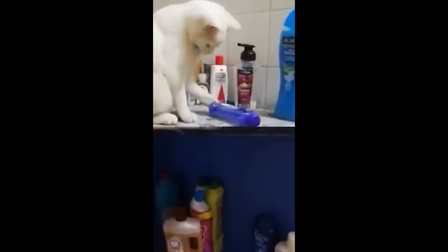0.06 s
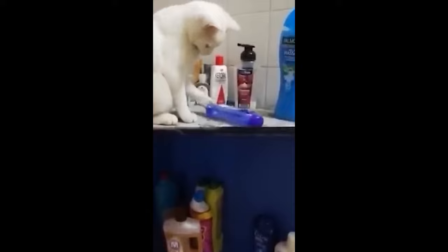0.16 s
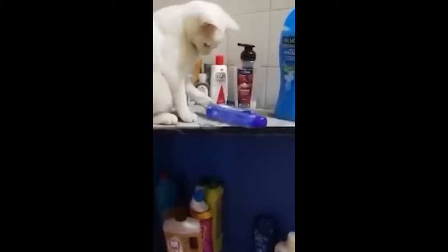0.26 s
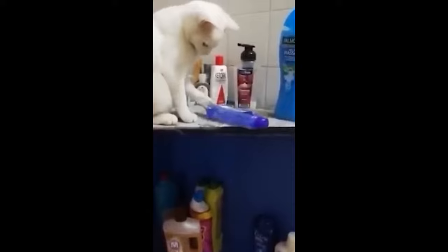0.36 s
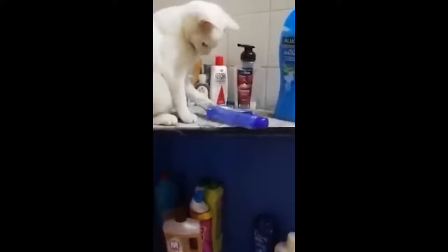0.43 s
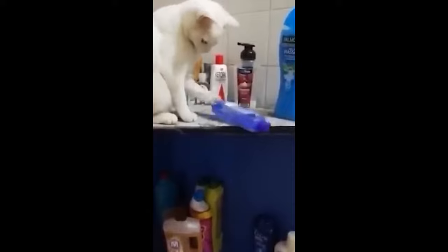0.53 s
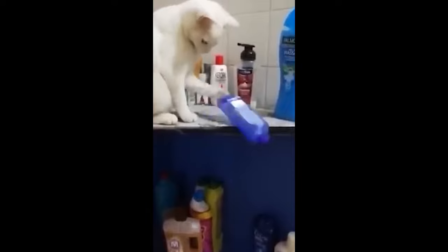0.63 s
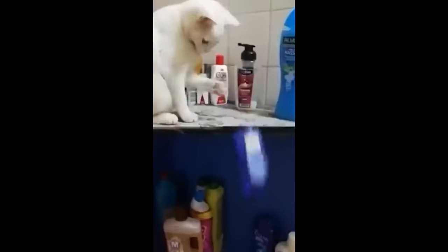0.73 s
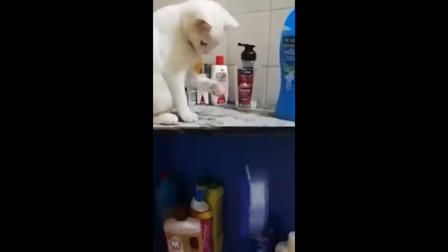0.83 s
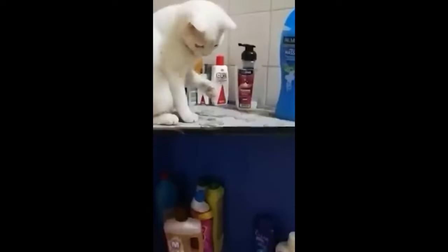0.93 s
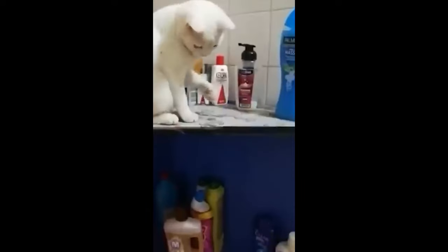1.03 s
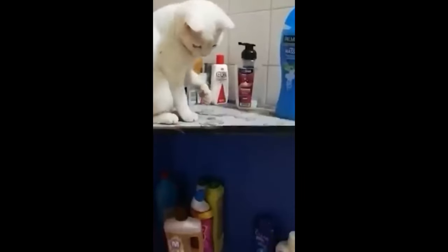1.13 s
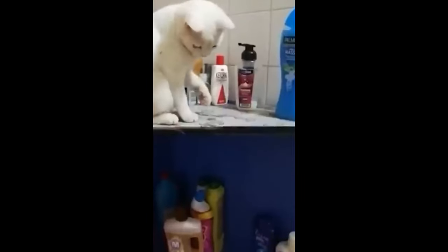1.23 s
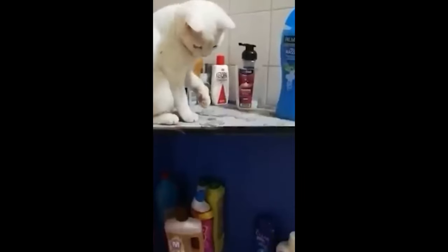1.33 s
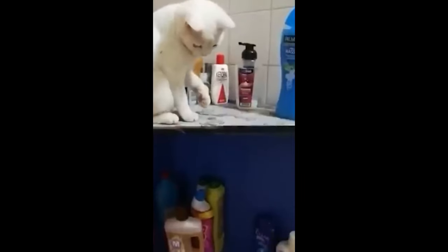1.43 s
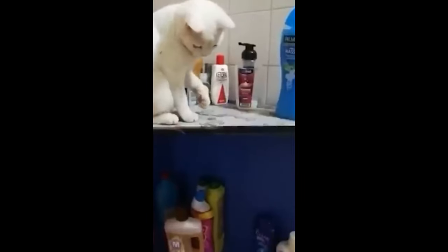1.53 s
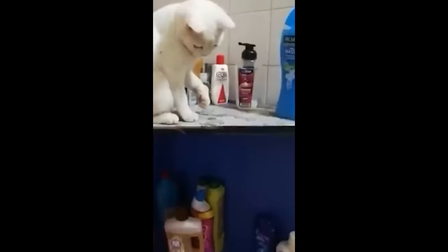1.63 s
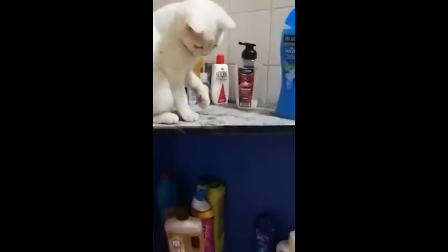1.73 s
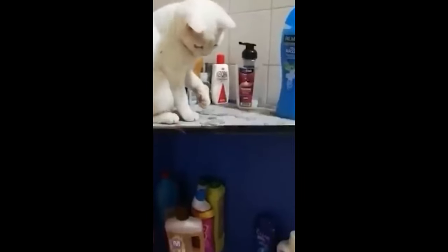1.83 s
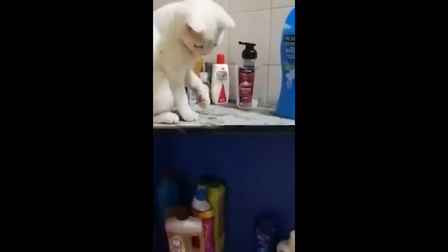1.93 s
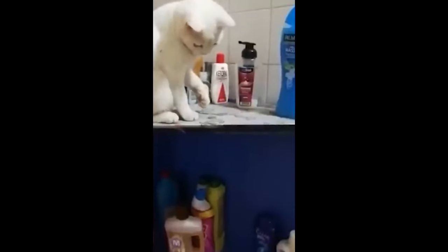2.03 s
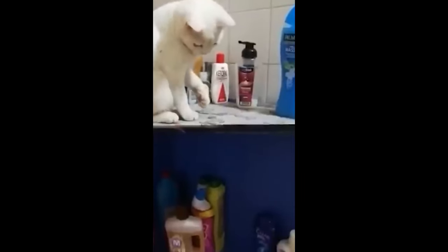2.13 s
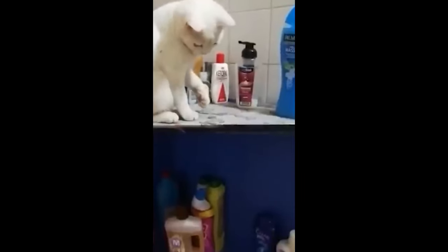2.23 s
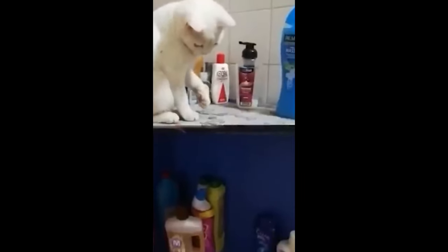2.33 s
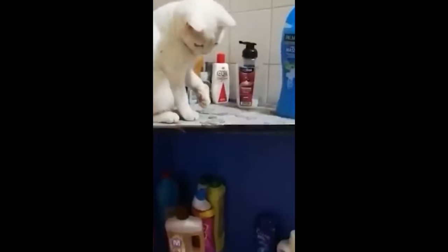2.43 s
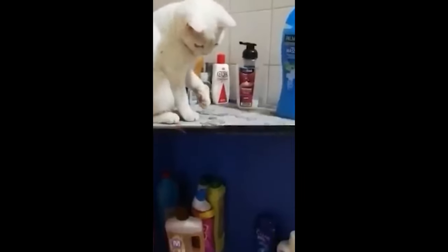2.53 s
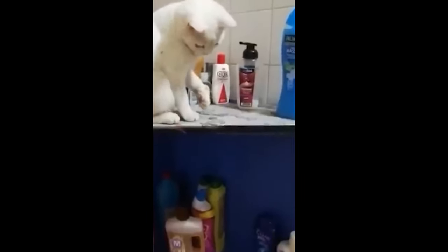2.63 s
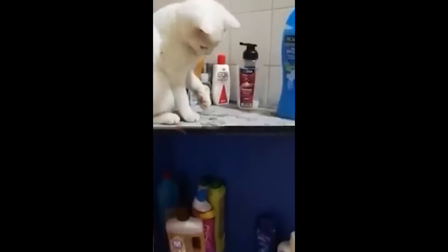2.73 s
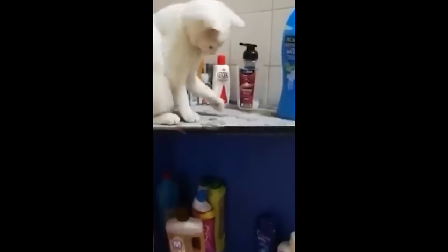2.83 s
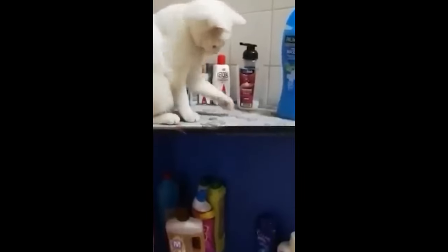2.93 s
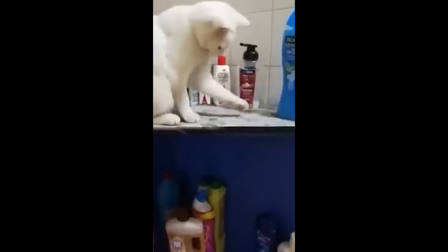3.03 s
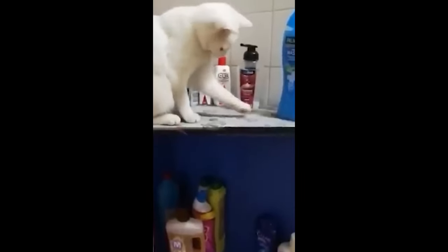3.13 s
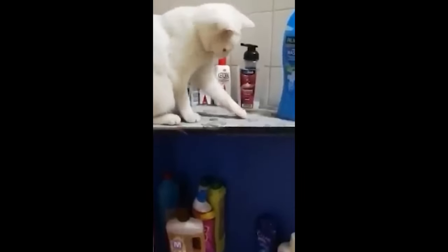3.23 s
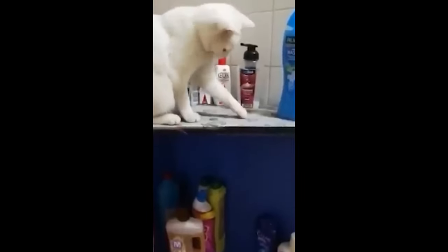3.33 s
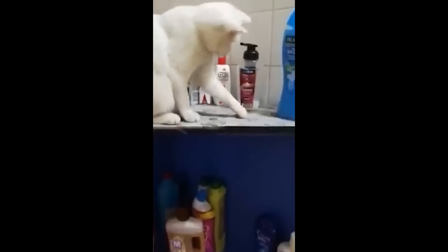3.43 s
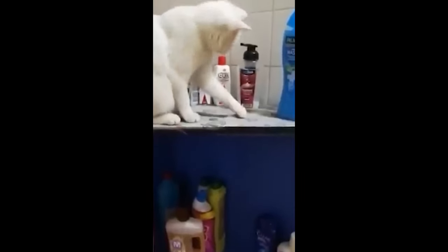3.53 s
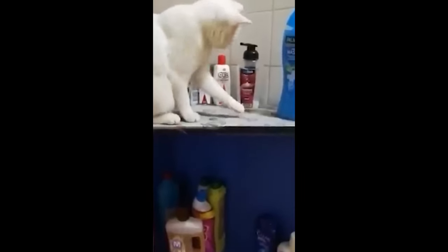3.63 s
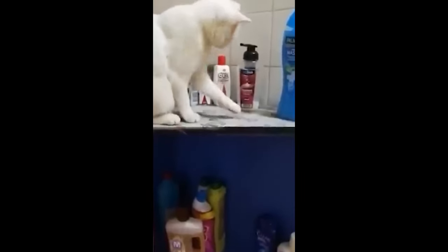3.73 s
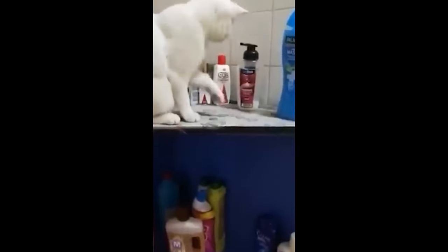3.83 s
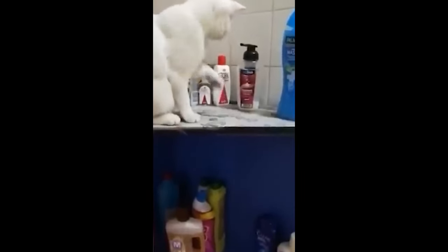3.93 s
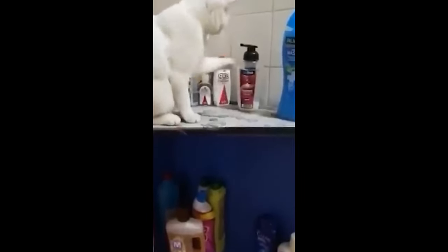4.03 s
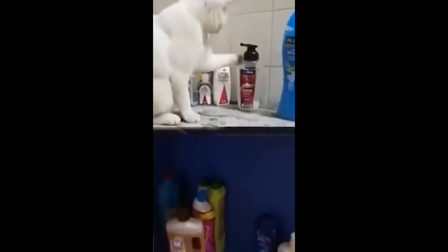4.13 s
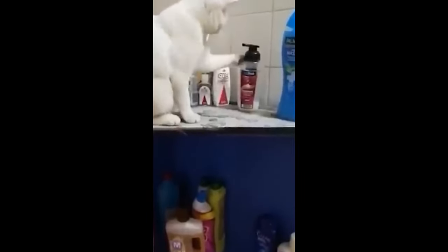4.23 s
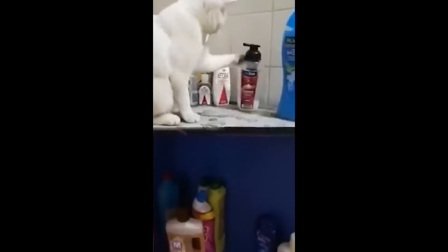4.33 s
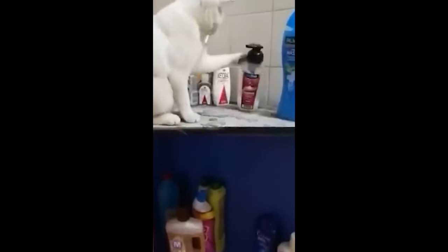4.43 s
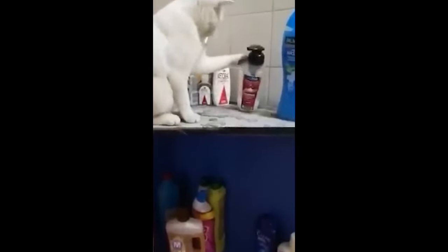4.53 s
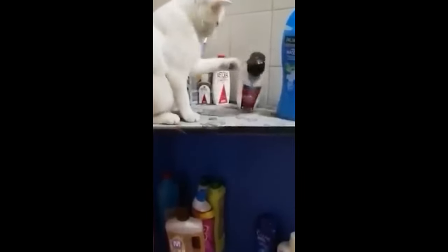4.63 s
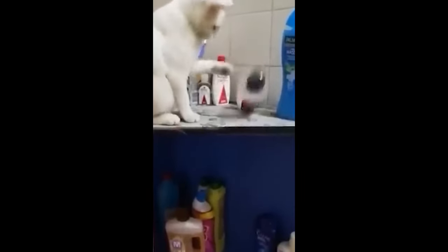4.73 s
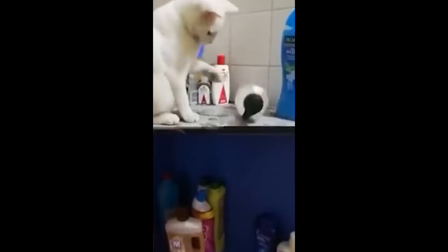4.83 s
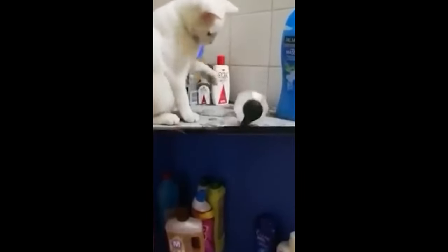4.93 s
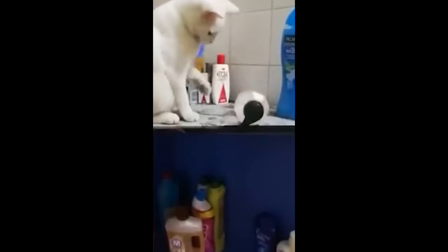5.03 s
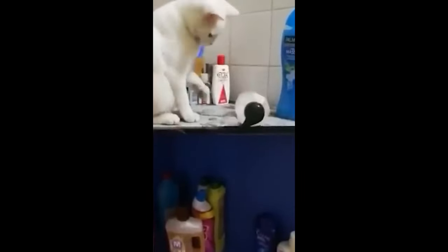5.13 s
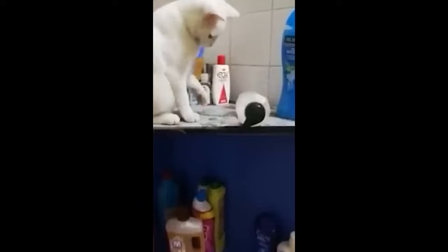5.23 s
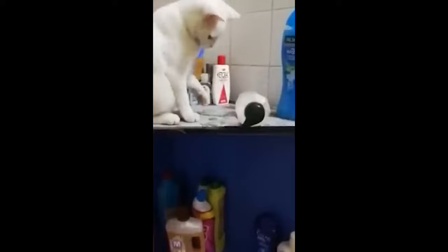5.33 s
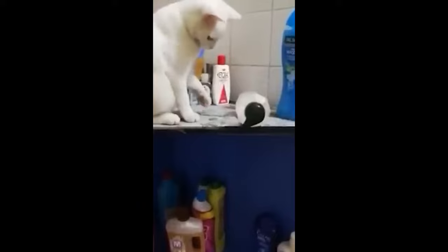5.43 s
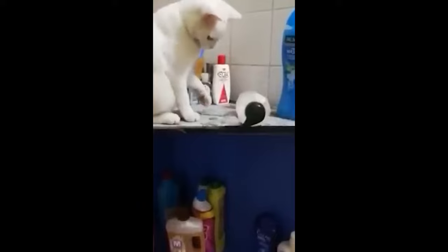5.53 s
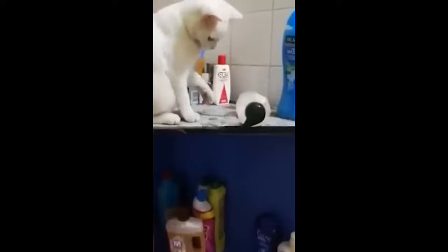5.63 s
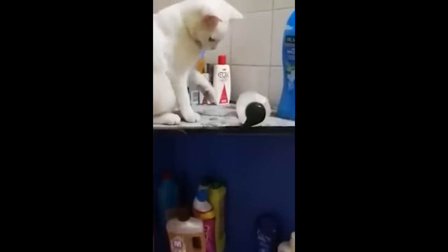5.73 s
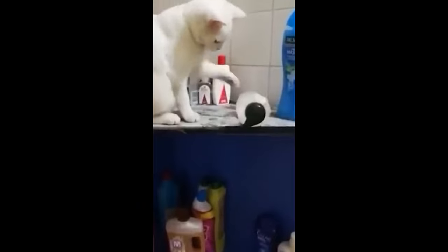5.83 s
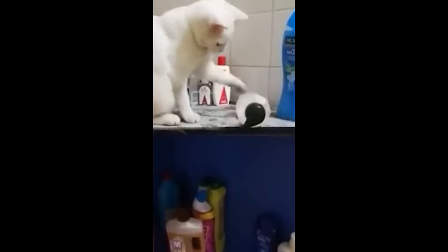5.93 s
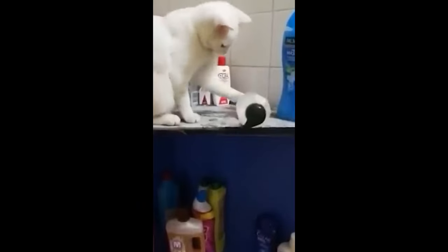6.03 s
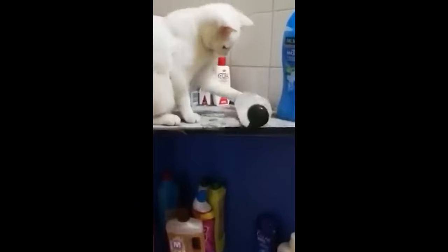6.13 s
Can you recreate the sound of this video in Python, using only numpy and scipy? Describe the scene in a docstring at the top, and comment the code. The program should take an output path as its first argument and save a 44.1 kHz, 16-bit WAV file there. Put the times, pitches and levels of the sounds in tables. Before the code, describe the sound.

Faint plastic scraping, a sharp echoing clatter on a tiled-room floor, small taps, then a soft hollow thump and brief rattle over low rumble.

```python
"""A light plastic bottle slides off a ledge in a small tiled bathroom, cracks on the floor and skitters: noise
bursts and damped wall modes. Later a full pump bottle topples with a dull thud, bounces and rattles to rest.
A cat pawing the bottles makes bright taps and the grainy hiss of stick-slip; the tiles answer with echoes.
Finger bumps rock the hand-held phone as a damped oscillator; low rumble and microphone hiss lie beneath.
The phone's right microphone is shaded."""
import sys
import numpy as np
from scipy import signal
from scipy.fft import rfft, irfft, next_fast_len
from scipy.io import wavfile
from scipy.ndimage import map_coordinates

SR = 44100
rng = np.random.default_rng(int(sys.argv[2]) if len(sys.argv) > 2 else 0)


def materialize(psi):
    """Save the field psi as 16-bit PCM at rate SR to the path in sys.argv[1].

    A 1-D psi becomes a single channel; in a 2-D psi each row is a channel.
    """
    bounded = np.clip(np.atleast_2d(psi).T, -1, 1)
    quanta = np.round(bounded * 32767).astype(np.int16)
    wavfile.write(sys.argv[1], SR, quanta)


N = 271964  # samples in the scene
T = np.arange(int(.7 * SR)) / SR  # time axis of one event, s

# Contacts of the light bottle, which lands end first, slaps down and skitters: start_s, level_db, burst_t60_s,
# tilt_db_per_octave, resonance_hz, resonance_db, wall_ring_db, hardness_hz, ring_pitch_ratio, echo_db (re burst)
FLOOR_CONTACTS = [(1.1213, -15, .016, 1, 8600, 6, 1, 14000, 1, 0),
                  (1.1244, -13.5, .028, -3, 1900, 4, -2, 4500, .985, 1),
                  (1.1278, -20, .01, -1, 7600, 6, -5, 3000, 1.01, -5),
                  (1.1346, -22, .01, -2, 4300, 6, -7, 2500, 1, -5),
                  (1.1371, -20.5, .019, 4, 8600, 4, -7, 9000, 1.02, -3),
                  (1.1422, -13.5, .0073, -4, 1600, 3, -7, 2500, .96, -1),
                  (1.153, -24.5, .014, 0, 3000, 2, -5.5, 3500, 1.03, 2),
                  (1.2084, -27, .015, -7, 600, 5, -6, 2000, .97, -.5),
                  (1.2288, -27.5, .018, -8, 800, 3, -6.5, 2000, 1.02, 0),
                  (1.262, -32, .016, -3.5, 4900, 3, -6.5, 3000, 1, .5),
                  (1.3655, -43, .04, -8, 1900, 3, -8, 1500, .97, -2)]
# Spectrum of its clatter: frequency_hz, density_db (per Hz)
SHELL_SPECTRUM = [(40, -53), (120, -26), (290, -7), (400, -6), (520, -7), (700, 0), (900, 1.5),
                  (1300, -3.5), (1600, -5), (2100, -2), (2450, -5), (3000, -7), (3900, -10), (5200, -17.5),
                  (6100, -19), (7500, -12.5), (9000, -12), (10800, -24.5), (13000, -32)]
# Modes of its thin wall: frequency_hz, level_db, t60_s, rise_s
WALL_MODES = [(426, -12.5, .08, 0.0011), (681.8, -7, .06, 0.00079), (902, -10, 0.16, .00068),
              (1108, -13, 0.14, .001), (1364, -10.5, 0.03, 0.0014), (1839, -9, 0.055, .00068),
              (2070, -9.5, 0.12, 0.00085), (2680, -11.5, 0.065, .001), (3029, -10.5, 0.072, .001),
              (3887, -18, 0.074, .001), (4920, -18, 0.066, .00079), (5560, -7, .018, 0.00045),
              (7500, -11.5, 0.061, 0.00052), (8350, -13, .04, .0005), (8950, -12.5, 0.051, .0005),
              (10310, -15.5, .04, .0005)]
# Standing waves between the tiles: frequency_hz, level_db, rise_s
STANDING_WAVES = [(97.52, -42.5, .026), (159.1, -32, .02), (186.5, -39.5, .02), (212.7, -34, 0.034),
                  (262.8, -31, .008), (304.8, -31.5, .0018), (318, -34, .0043), (410, -38.5, .008),
                  (448, -40.5, 0.00811), (580, -36.5, .008), (684, -37, 0.0084), (746, -33, 0.014),
                  (806, -28.5, 0.021), (853, -34, .009), (1097, -37, .012), (1230, -37, 0.0077),
                  (1297, -38.5, 0.017), (1432, -36.5, .013), (1522, -39.5, 0.011), (1711, -38.5, 0.009),
                  (1850, -37, 0.011), (1990, -37.5, .01), (2304, -36.5, .01), (2950, -39.5, .0065),
                  (3348, -40, 0.0089), (5080, -46.5, 0.011), (7100, -41, 0.0093), (8075, -41.5, .01),
                  (8593, -41, .01), (9098, -41.5, .01)]
# Its two ends set the room booming: start_s, level_db, hardness_hz
ROOM_BOOMS = [(1.1212, -1, 14080), (1.208, 2, 165.4)]
FOCUS_WIDTH = .2  # of the resonance of the part that lands, in log frequency
CRASH_LIFE = 0.93  # share of the room's decay time
BOOM_WANDER_RAD = 0.72  # the standing waves waver as they die


def falling_bottle():
    """Impact excitation: each contact rings the shell differently; two stir the room's standing waves."""
    out = np.zeros((2, N))
    for (s, db, t60, tilt_db, focus_hz, focus_db,
         ring_db, hardness_hz, pitch, echo_db) in FLOOR_CONTACTS:
        def colour_db(hz):
            tilt = tilt_db * np.log2((hz + 500) / 2500)
            return along(SHELL_SPECTRUM, hz) + tilt + focus_db * hump(hz, focus_hz, FOCUS_WIDTH)

        clatter = contact(colour_db, t60, attack=0.00029, wet_db=echo_db, life=CRASH_LIFE)
        wall = ring(WALL_MODES, hardness_hz, pitch=pitch, scatter_db=0.5)
        add(out, s, amp(db) * (clatter + amp(ring_db) * wall))
    waves = [(hz, db, CRASH_LIFE * along(ROOM_DECAY, hz), rise) for hz, db, rise in STANDING_WAVES]
    for s, db, hardness_hz in ROOM_BOOMS:
        add(out, s, amp(db) * ring(waves, hardness_hz, wander=BOOM_WANDER_RAD))
    return out


# Blows of the full bottle on the ledge: start_s, boom_db, hardness_hz, knock_db, body_resonance_db
LEDGE_BLOWS = [(4.977, -27.5, 364, -27, 9), (5.0955, -29.5, 133, -35, -7), (5.167, -57, 165, -51.5, 5),
               (5.213, -44, 169, -56, 8)]
# Modes of the ledge and the air around it: frequency_hz, level_db, t60_s, rise_s
LEDGE_MODES = [(58.8, -17, 0.62, .0046), (84.9, -3, 0.32, 0.0062), (100, -1, 0.58, 0.0077),
               (126.6, -7, 0.41, 0.016), (159, -7, 0.32, 0.018), (185.2, 2.5, 0.32, .0054),
               (206.1, 3.5, 0.35, 0.0054), (245.5, -13.5, .7, 0.0027), (301, -8, 0.039, .0017),
               (337, -6.5, 0.26, 0.002), (394.5, -13, 0.38, .0012), (412, -14, .3, .003),
               (450, -13, 0.34, .0019), (515, -22, 0.23, .002), (540, -16.5, 0.23, .002)]
# Spectrum of the knock: frequency_hz, density_db (per Hz)
KNOCK_SPECTRUM = [(30, -42), (100, -4), (330, 4.5), (480, 1), (700, -7.5), (900, -8), (1130, -6),
                  (1500, -14), (2100, -26), (3000, -27), (6000, -55), (13000, -60)]
BODY_HZ, BODY_WIDTH = 1110, .2  # the full bottle's hollow note; width in log frequency


def toppling_bottle():
    """Modal response to soft blows: the ledge booms, and the body resonance varies from blow to blow."""
    out = np.zeros((2, N))
    for s, boom_db, hardness_hz, knock_db, body_db in LEDGE_BLOWS:
        def colour_db(hz):
            return along(KNOCK_SPECTRUM, hz) + body_db * hump(hz, BODY_HZ, BODY_WIDTH)

        boom = ring(LEDGE_MODES, hardness_hz)
        knock = contact(colour_db, t60=0.051, attack=0.0034, wet_db=0.5, life=0.57)
        add(out, s, amp(boom_db) * boom)
        add(out, s - .001, amp(knock_db) * knock)
    return out


# Light taps of claw, cap and pump head: start_s, level_db, burst_t60_s, pitch_hz, resonance_db, echo_db (re burst)
LIGHT_TAPS = [(0.739, -46, 0.0059, 7100, 10.5, 1), (0.907, -55, 0.076, 2210, 30, 0),
              (3.347, -49, 0.0048, 4000, 14, -16), (3.354, -43, 0.0053, 7500, 14.5, -7),
              (3.7814, -27.5, 0.008, 7900, 6, -1), (3.8022, -46, 0.023, 8300, 1, -5),
              (4.966, -60.5, 0.039, 1300, 13, 5), (4.975, -45, 0.023, 8100, 0, 2),
              (5.0925, -44.5, 0.025, 4270, 19, -5), (5.101, -48.5, 0.023, 4470, 12, 0),
              (5.1098, -42.5, 0.0091, 4100, 16, -11), (5.1359, -48.5, 0.028, 4000, 4, 1.5),
              (5.164, -58, 0.021, 6000, 9, 1), (5.1766, -39, 0.0071, 7140, 4, -4),
              (5.2212, -45.5, 0.0099, 7900, 10, -4)]
# Spectrum of a tap: frequency_hz, density_db (per Hz)
TAP_SPECTRUM = [(60, -30), (400, -9), (750, -8.5), (1200, -1.5), (2000, -2.5), (3200, -2), (3900, -3.5),
                (4600, -1), (5800, -1), (8500, 0), (9700, -0.5), (10500, -7.5), (12000, -5.5),
                (13000, -14.5)]
# Modes of a hard plastic cap: frequency_hz, level_db, t60_s, rise_s
CAP_MODES = [(4380, -11, 0.02, .00046), (6320, -15, .06, .00026), (7700, -17, .05, .0003),
             (8750, -13.5, 0.077, .00025), (9620, -18, 0.036, .0003), (11950, -23, .05, .0003)]
TAP_WIDTH = 0.42  # of a tap's resonance, in log frequency
CAP_SCATTER = 0.025  # each tap meets the cap at another spot and shifts its pitch by up to this share
REBOUND_S, REBOUND_DB = 0.0069, -13  # every tap touches once more, this much later and softer


def taps():
    """Impact and rebound: bright contacts touch twice, ping the caps and echo briefly around the ledge."""
    out = np.zeros((2, N))
    for s, db, t60, pitch_hz, peak_db, echo_db in LIGHT_TAPS:
        def colour_db(hz):
            return along(TAP_SPECTRUM, hz) + peak_db * hump(hz, pitch_hz, TAP_WIDTH)

        click = contact(colour_db, t60, attack=0.000274, wet_db=echo_db, life=0.6)
        cap_pitch = 1 + CAP_SCATTER * rng.uniform(-0.97, 1)
        touch = click + amp(-3.0) * ring(CAP_MODES, pitch=cap_pitch, scatter_db=2.0)
        add(out, s, amp(db) * touch)
        add(out, s + REBOUND_S, amp(db + REBOUND_DB) * touch)
    return out


# Plastic or paw sliding over the ledge: start_s, swell_s, fade_s, level_db, pitch_hz, resonance_db
SLIDE_STROKES = [(.03, 0.28, 0.3, -58, 5000, -2.5), (.3, 0.2, 0.11, -68.5, 4300, 12.5),
                 (0.598, 0.19, 0.14, -59.5, 7030, 3.5), (3.327, 0.021, 0.022, -50, 7600, 8),
                 (3.706, 0.019, 0.024, -64.5, 8000, 7.5), (5.091, 0.005, 0.022, -56.5, 8600, 0),
                 (5.128, .045, .022, -54, 6930, 4), (5.212, 0.0069, 0.046, -52.5, 8500, 5)]
# Spectrum of the scrape: frequency_hz, density_db (per Hz)
SCRAPE_SPECTRUM = [(800, -12), (2200, -10.5), (3300, -6.5), (4700, -2.5), (6000, -4.5), (8300, 0),
                   (10500, -6.5), (13000, -15)]
STROKE_WIDTH = 0.2  # of a stroke's resonance, in log frequency
PRESSURE_POWER = 0.8  # amplitude of the hiss against the pressure of a stroke
CATCH_PER_S, CATCH_DB = 110, 0.5  # a stroke catches and frees unevenly
SLIPS_PER_S, SLIP_SCATTER_DB = 9000, 1.5
SLIDE_DRY_DB, SLIDE_ECHO_DB = -4.5, -7


def sliding():
    """Stick-slip friction: dense tiny slips of uneven size hiss as each stroke presses, catches and lets go."""
    hiss = np.zeros(N)
    for s, swell, fade, db, pitch_hz, peak_db in SLIDE_STROKES:
        def colour(hz):
            return amp(along(SCRAPE_SPECTRUM, hz) + peak_db * hump(hz, pitch_hz, STROKE_WIDTH))

        pressure = np.interp(T, [0, swell, swell + fade], [0, 1, 0])
        catch = amp(CATCH_DB * wobble(CATCH_PER_S, size=len(T)))
        slip_now = rng.random(len(T)) < SLIPS_PER_S / SR
        slip_size = rng.standard_normal(len(T)) * amp(SLIP_SCATTER_DB * rng.standard_normal(len(T)))
        grain = unit(filtered(slip_now * slip_size, colour))
        add(hiss, s, amp(db) * pressure ** PRESSURE_POWER * catch * grain)
    tail = room_tail(np.zeros_like, build=0.0038, life=0.75)
    echo = signal.fftconvolve(hiss[None], tail, axes=1)[:, :N]
    return amp(SLIDE_DRY_DB) * hiss + amp(SLIDE_ECHO_DB) * echo


# Bumps of the hand on the phone: start_s, peak_db, swing_hz, hardness_hz
PHONE_BUMPS = [(0.07, -37, 92.3, 221), (0.344, -55, 74.6, 129), (0.616, -51.5, 91, 342),
               (0.931, -47, 101.7, 465), (1.783, -41.5, 93, 141), (2.389, -47, 90, 132),
               (2.673, -35.5, 60, 345), (2.7579, -30, 126.7, 1240), (2.864, -51.5, 108, 480),
               (2.894, -45, 83.4, 112), (3.464, -45.5, 90, 150), (3.819, -44.5, 79, 122),
               (4.264, -51, 86.8, 119), (4.442, -42.5, 99.7, 120), (5.905, -47.5, 83.3, 464)]
SWAY_DAMPING = 0.65  # the phone rocks in the grip
CASE_HZ = 297  # above this its case passes less and less of a push


def hand_bumps():
    """Damped oscillator: a push rocks the phone briefly, a hard one knocks; both microphones move alike."""
    out = np.zeros(N)
    push = signal.unit_impulse(SR // 10, "mid")
    for s, db, swing_hz, hardness_hz in PHONE_BUMPS:
        def response(hz):
            sway = hz ** 2 / (swing_hz ** 2 - hz ** 2 + 1j * SWAY_DAMPING * swing_hz * hz)
            case = 1 / (1 + 1j * hz / CASE_HZ)
            softness = 1 / (1 + (hz / hardness_hz) ** 8)
            return sway ** 2 * case * softness

        swing = filtered(push, response)
        add(out, s - 1 / 20, amp(db) * swing / np.abs(swing).max())  # the push sits 1/20 s in
    return out


# Spectrum of the background: frequency_hz, density_db (per Hz)
BACKGROUND_SPECTRUM = [(12, -28.5), (20, 1.5), (64, 1.5), (99, -4), (126, -12), (249, -14), (277, -18.5),
                       (416, -21), (531, -26.5), (715, -25), (1000, -22), (1490, -24.5), (2420, -26.5),
                       (6500, -29), (9390, -28.5), (13000, -37.5)]
# Its left-right coherence: frequency_hz, likeness (1 = identical)
BACKGROUND_LIKENESS = [(100, 0.99), (250, 0.41), (600, 0.12), (2000, 0.085)]


def background():
    """Stationary and modulated noise: a low, restless rumble under even microphone hiss."""
    noise = noise_pair(BACKGROUND_LIKENESS, size=N)
    air = unit(filtered(noise, lambda hz: amp(along(BACKGROUND_SPECTRUM, hz))))
    low = filtered(air, lambda hz: 1 / (1 + (hz / 200) ** 4))
    restless = amp(-61.0 + 1.6 * wobble(29, size=N))
    return amp(-62.0) * (air - low) + restless * low


# Reverberation time of the tiled room: frequency_hz, t60_s (each source takes a share of it)
ROOM_DECAY = [(100, 1), (160, .55), (260, .82), (350, .67), (750, .56), (2000, .45), (5000, .5),
              (9000, .42), (13000, .46)]
# Left-right coherence of its echo: frequency_hz, likeness (1 = identical)
ROOM_LIKENESS = [(130, 1), (280, 0.99), (600, 0.64), (1300, 0.23), (2800, 0.27)]
FLUTTER_PER_S, FLUTTER_DB = 90, 2  # the echo arrives in uneven waves from wall to wall


def room_tail(colour_db, build, life):
    """Diffuse reverberation: noise builds up, then decays by a share of the room's t60; left energy is 1."""
    wash = filtered(noise_pair(ROOM_LIKENESS, size=len(T)), lambda hz: amp(colour_db(hz)))
    hz, t, z = signal.stft(wash, SR, nperseg=256)
    ripple_db = 3.4 * rng.standard_normal((len(hz), 1))  # the near walls favour some pitches
    decay_db = -60 * t / (life * along(ROOM_DECAY, hz)[:, None])
    tail = signal.istft(z * amp(ripple_db + decay_db), SR, nperseg=256)[1][:, :len(T)]
    flutter = amp(FLUTTER_DB * wobble(FLUTTER_PER_S, size=len(T)))
    tail = tail * (1 - np.exp(-(T / build) ** 2)) * flutter
    return tail / np.linalg.norm(tail[0])


RIPPLE_HZ, RIPPLE_DB = 168, 2.5  # spacing and depth of the dense resonances each point of contact picks out
ECHO_BUILD_S = .005  # the walls are close; a tenth of the burst's t60 is added


def contact(colour_db, t60, attack, wet_db, life):
    """Broadband impact: a gritty burst through dense resonances, and the room's answer in the same colour."""
    knots_db = RIPPLE_DB * rng.standard_normal(size=128)

    def hollow_db(hz):
        ripple_db = np.interp(hz / RIPPLE_HZ, np.arange(len(knots_db)), knots_db)
        return colour_db(hz) + ripple_db * hz / (hz + RIPPLE_HZ)  # ripples fade towards the bass

    grit = filtered(rng.standard_normal(len(T)), lambda hz: amp(hollow_db(hz)))
    envelope = amp(-60 * T / t60) * (1 - np.exp(-T / attack))
    burst = grit * amp(1.2 * wobble(700, size=len(T))) * envelope
    echo = room_tail(hollow_db, ECHO_BUILD_S + t60 / 10, life)
    return np.linalg.norm(envelope) * (burst / np.linalg.norm(burst) + amp(wet_db) * echo)


def ring(modes, hardness_hz=np.inf, pitch=1, scatter_db=0, wander=0):
    """Modal superposition: damped sines; a soft blow leaves the modes above its hardness weak."""
    out = np.zeros(len(T))
    for hz, db, t60, rise in modes:
        drift = 0
        if wander:
            drift = wander * wobble(25, size=len(T)) * np.minimum(T * 10, 1)  # phase, full after 0.1 s
        decay = amp(db + scatter_db * rng.standard_normal() - 60 * T / t60)
        level = decay / np.hypot(1, (hz / hardness_hz) ** 2)
        out += level * (1 - np.exp(-T / rise)) * np.sin(2 * np.pi * hz * pitch * T + drift)
    return out


def noise_pair(alike, size):
    """Partial coherence: mid and side noise mixed so that two microphones are as alike as given."""
    def mid_side_gain(hz):
        turn = np.arccos(np.clip(along(alike, hz), -1, 1)) / 2
        return np.array([np.cos(turn), np.sin(turn)])

    mid, side = filtered(rng.standard_normal((2, size)), mid_side_gain)
    return np.array([mid + side, mid - side])


def hump(hz, centre_hz, width):
    """Resonance curve: height 1 at the centre, on a log frequency axis."""
    return 1 / (1 + (np.log((hz + 1) / centre_hz) / width) ** 2)


def wobble(rate, size):
    """Slow random modulation: a smooth curve through random knots, rate of them a second."""
    knots = rng.standard_normal(int(size * rate / SR) + 4)
    return map_coordinates(knots, [np.arange(size) * rate / SR])


def filtered(x, response):
    """Linear filtering: the spectrum of x times a response of frequency."""
    size = x.shape[-1]
    m = next_fast_len(size + 8192)
    return irfft(rfft(x, m) * response(np.fft.rfftfreq(m, 1 / SR)), m)[..., :size]


def along(points, hz):
    """Logarithmic frequency scale: read (Hz, value) points between their knots."""
    f, v = np.transpose(points)
    return np.interp(np.log(hz + 1), np.log(f + 1), v)


def amp(db):
    """Decibel scale: level to amplitude gain."""
    return 10 ** (np.asarray(db) / 20)


def unit(x):
    """Root mean square: scale to rms 1."""
    return x / np.sqrt(np.mean(x ** 2) + 1e-20)


def add(track, s, sound):
    """Superposition: mix a sound into a track from time s."""
    part = track[..., round(s * SR):][..., :sound.shape[-1]]
    part += sound[..., :part.shape[-1]]


# Shading of the right microphone: frequency_hz, left_minus_right_db
MICROPHONE_SHADE = [(200, -1), (360, -1), (660, 9), (1200, 8.5), (2200, 10), (4000, 22), (7200, 28),
                    (13000, 30.5)]


def scene():
    """Acoustic shadow: airborne sound loses its treble at the shaded right microphone."""
    def shade(hz):
        shade_db = along(MICROPHONE_SHADE, hz)
        return 2 / (1 + amp(np.array([-shade_db, shade_db])))

    airborne = falling_bottle() + toppling_bottle() + taps() + sliding()
    return filtered(airborne, shade) + hand_bumps() + background()


LEFT_LEAD_S = .00059
TOP_HZ = 13150


def record(dry):
    """Delay, saturation and band limit: left runs early, loud peaks are rounded and the top is cut."""
    sides = np.array([[1], [-1]])  # left is advanced and right delayed by half the lead
    offset = filtered(dry, lambda hz: np.exp(1j * np.pi * hz * LEFT_LEAD_S * sides))
    rounded = offset / (1 + np.abs(offset / .5) ** 6) ** (1 / 6)
    return filtered(rounded, lambda hz: 1 / (1 + (hz / TOP_HZ) ** 120))


dry = scene()
out = record(dry)
materialize(out)
```